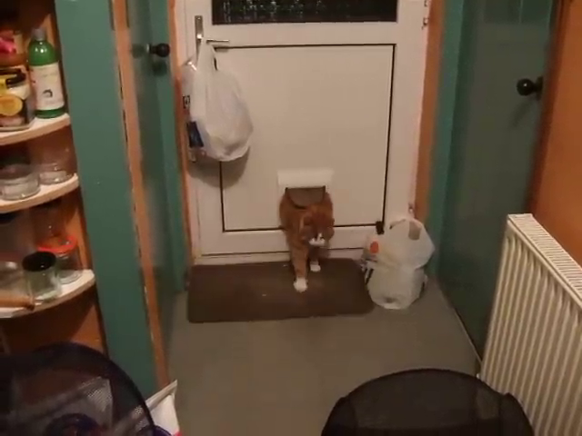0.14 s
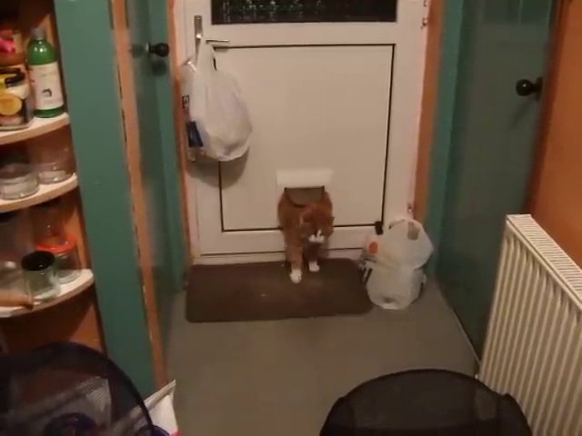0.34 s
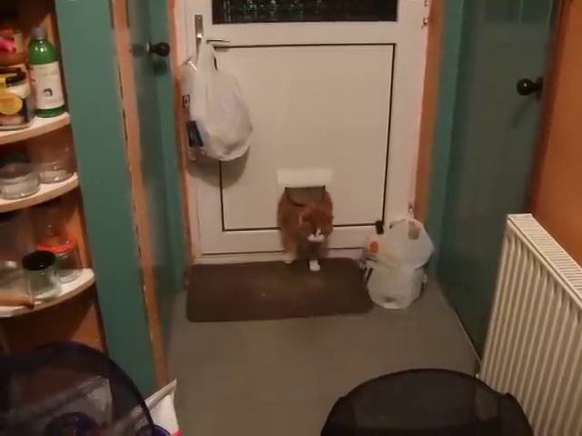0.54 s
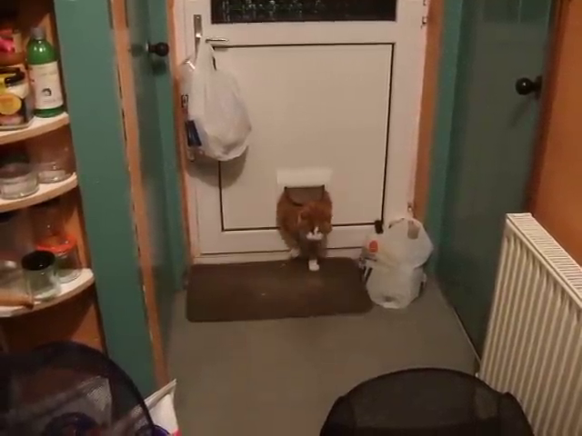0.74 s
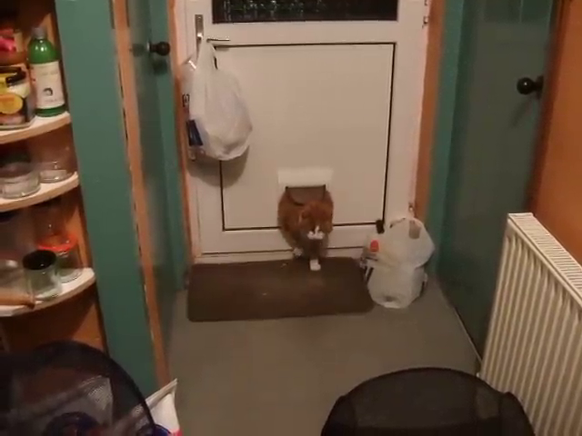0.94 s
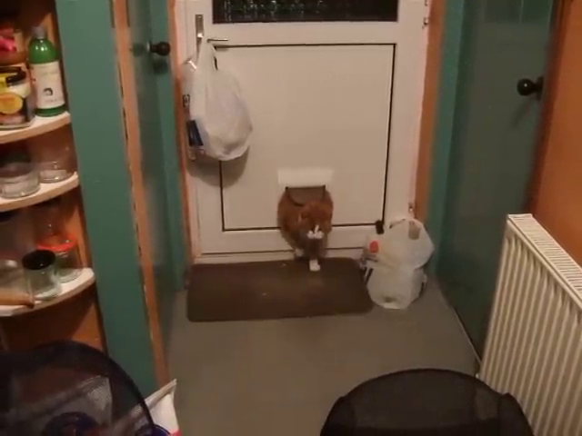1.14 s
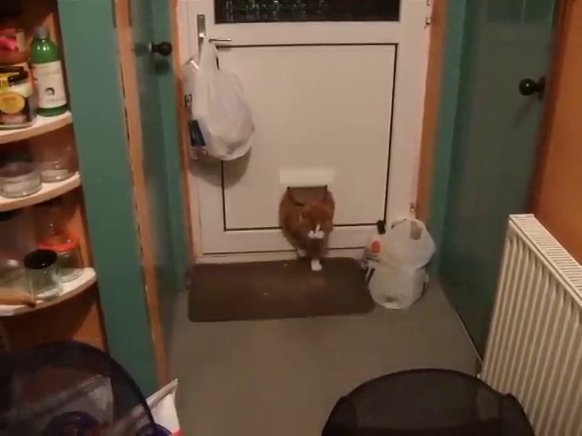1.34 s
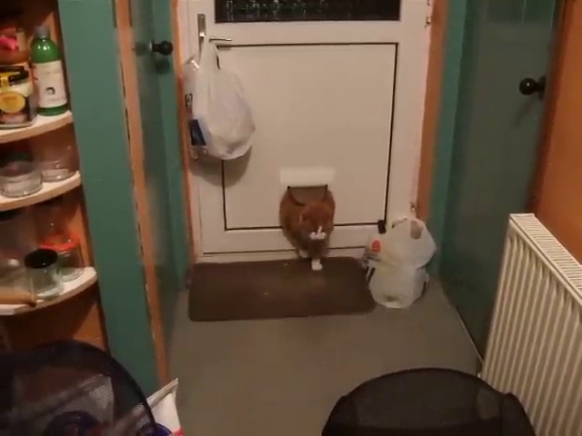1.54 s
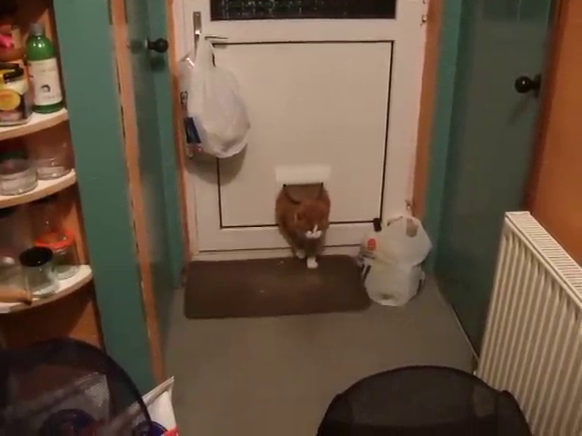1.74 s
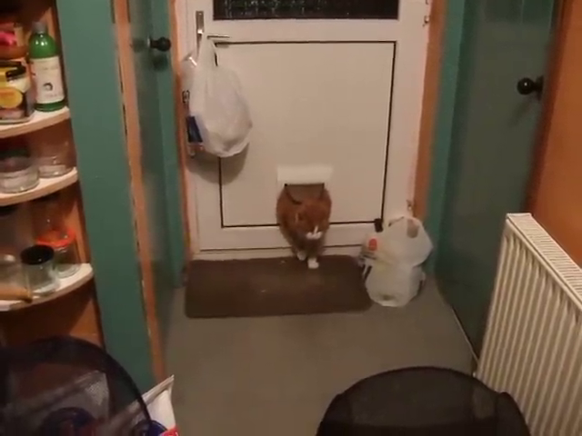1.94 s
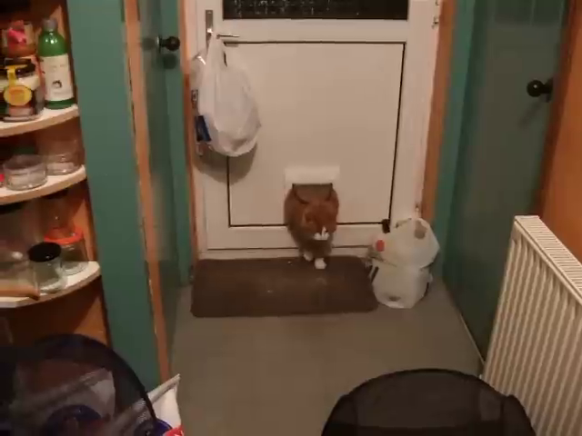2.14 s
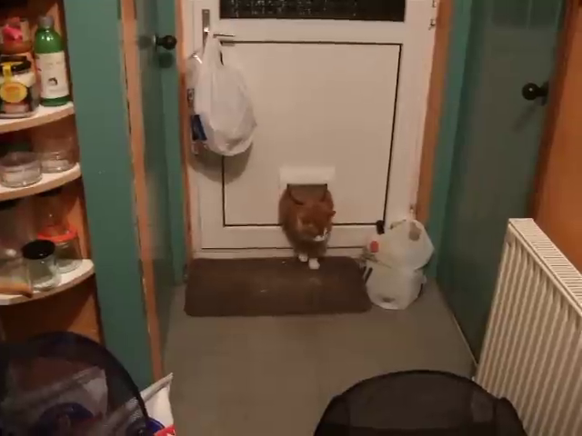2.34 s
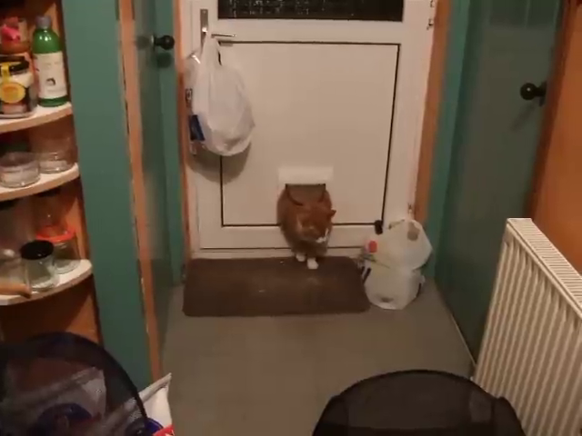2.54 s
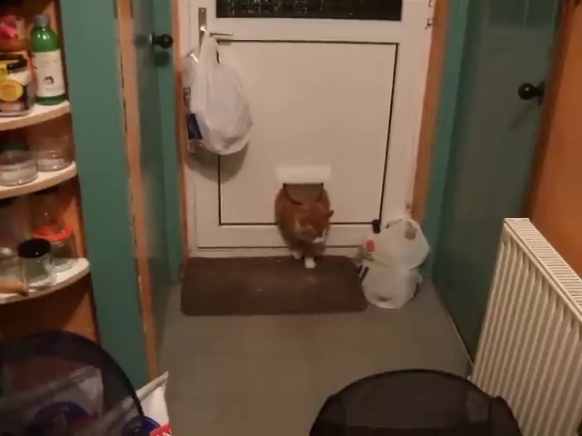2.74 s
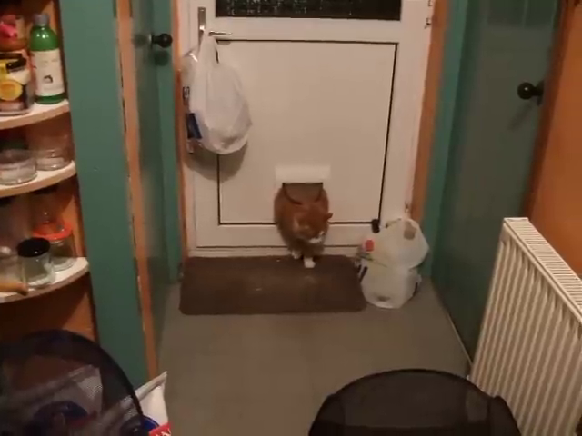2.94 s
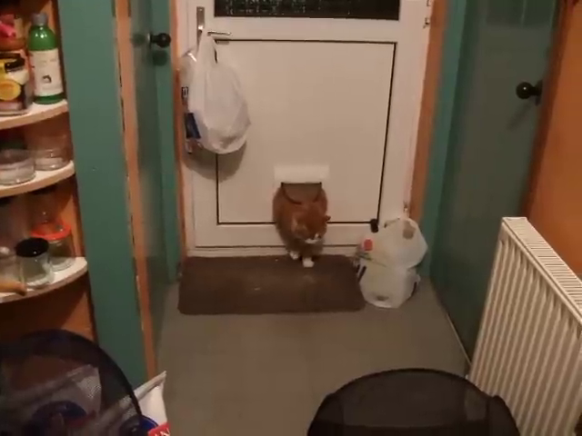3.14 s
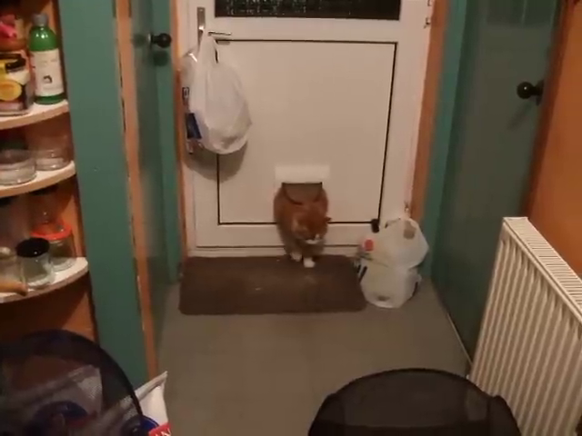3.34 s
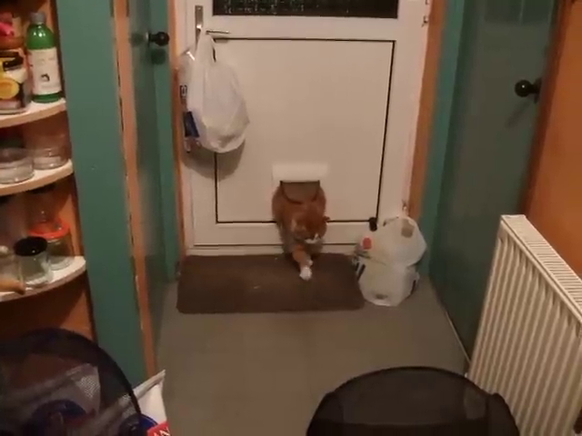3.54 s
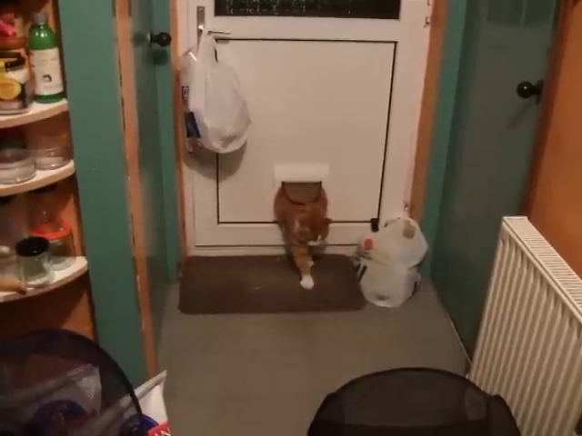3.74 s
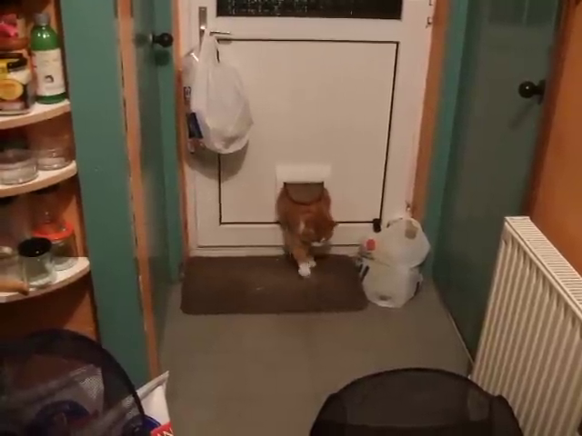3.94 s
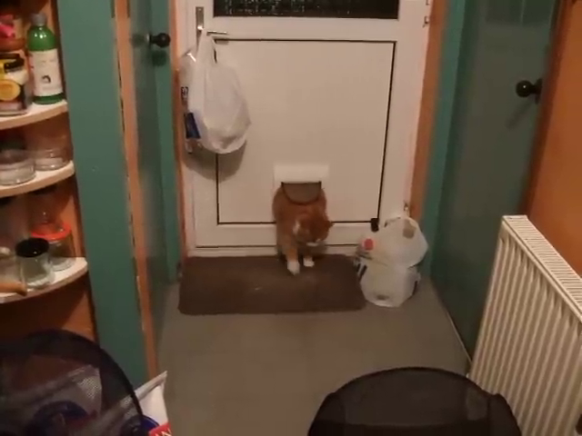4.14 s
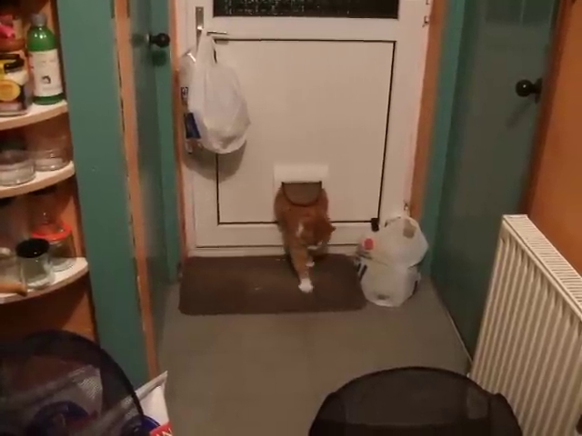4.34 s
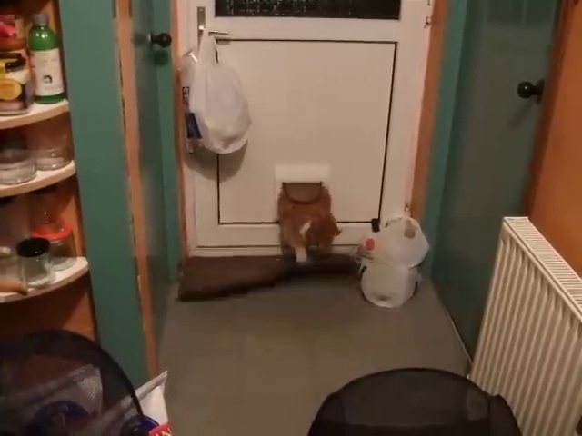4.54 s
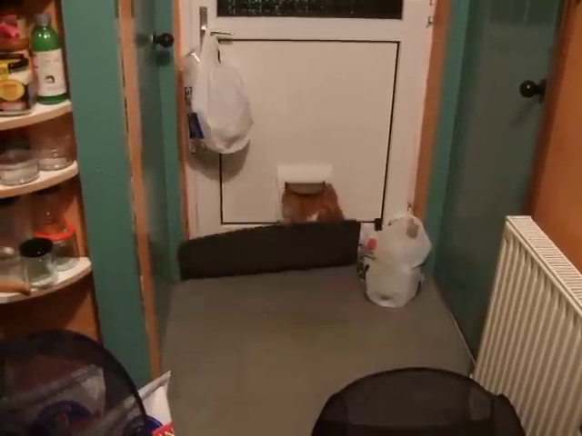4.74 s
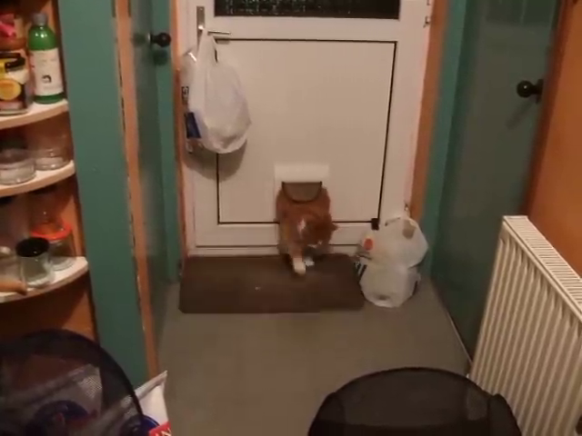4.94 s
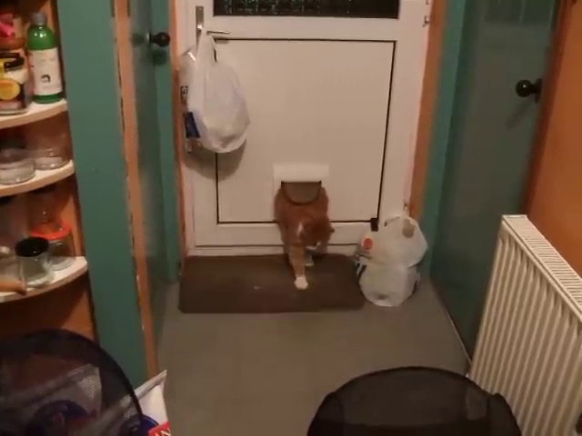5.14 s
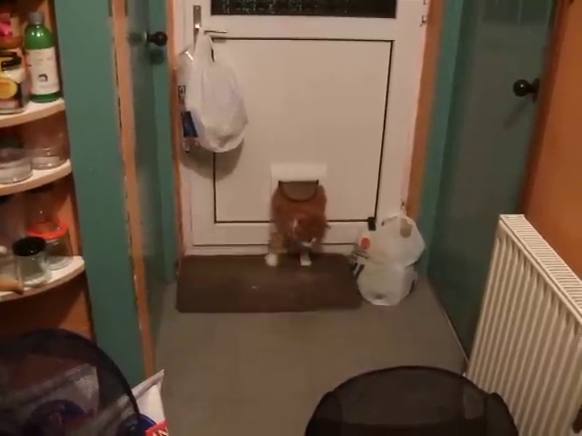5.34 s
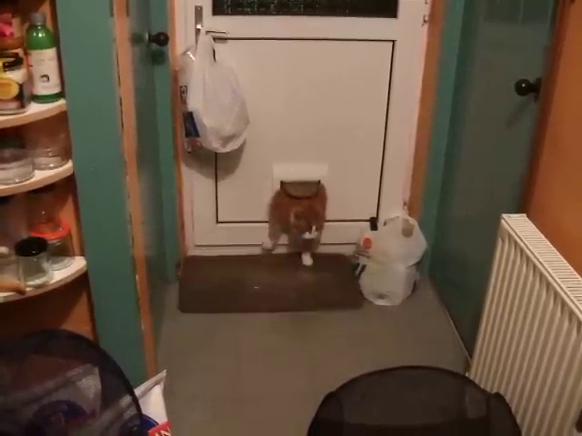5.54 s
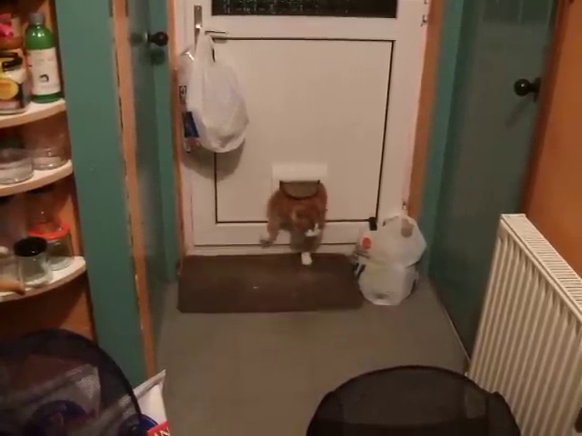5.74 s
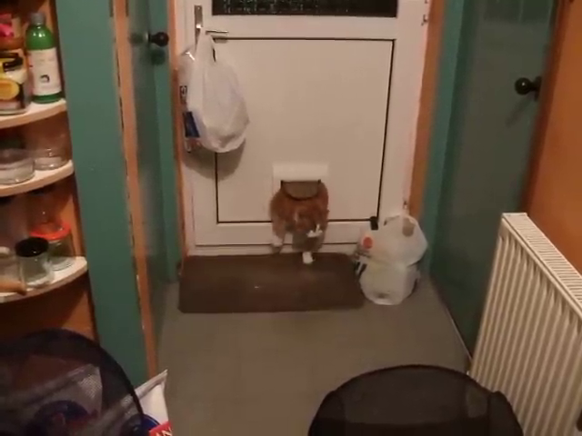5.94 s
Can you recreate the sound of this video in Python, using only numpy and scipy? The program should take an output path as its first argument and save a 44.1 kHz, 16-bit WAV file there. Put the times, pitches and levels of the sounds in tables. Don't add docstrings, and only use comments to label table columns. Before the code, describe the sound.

A cat pushes through a flap in a hollow door. An opening clatter fades into a long, grainy lull of fridge hum, broken by a tiny high meow that cracks at the end. Then come light plastic taps, dull thumps, a quickening rattle of mat and carrier bags, and one hard slap with bottles ringing. Soft rubbing and taps follow. Short indoor echo, gritty low-resolution camera sound.

```python
import sys
import numpy as np
from scipy import signal
from scipy.fft import rfft, irfft, next_fast_len
from scipy.io import wavfile
from scipy.ndimage import map_coordinates

SR = 44100
rng = np.random.default_rng(int(sys.argv[2]) if len(sys.argv) > 2 else 0)


def to_wav(sig):
    pcm = np.clip(np.atleast_2d(sig), -1, 1) * 32767
    pcm = np.round(pcm).astype(np.int16)
    wavfile.write(sys.argv[1], SR, pcm.T)


def ratio(d):
    e = np.asarray(d, float) / 20
    return 10 ** e


N = 264159

# centre f/Hz, width/Hz, level/dB
DOOR_MODES = [(297, 15, -1.5), (331.6, 20, -1), (354, 28, -3.5), (408.4, 30, -1.5)]
# centre f/Hz, width/Hz, level/dB
FLAP_MODES = [(525, 80, 3.5), (686, 100, -0.5), (802, 87, 3.5), (919.5, 90, 1), (1068, 100, -2.5),
              (1358, 180, -8)]
# centre f/Hz, width/Hz, level/dB
FLOOR_MODES = [(64, 81, -15.5), (89.8, 22, 0.5), (167, 30, 0), (228.6, 40, -5)]


def unit(x):
    return x / np.sqrt(np.mean(x ** 2) + 1e-20)


def along(points, hz):
    f, value = np.transpose(points)
    return np.interp(np.log(hz + 1), np.log(f + 1), value)


def curves(rows):
    s, *columns = np.transpose(rows)
    return [np.interp(np.arange(N) / SR, s, column) for column in columns]


def wobble(rate):
    knots = rng.standard_normal(int(N * rate / SR) + 4)
    return map_coordinates(knots, [np.arange(N) * rate / SR])


def filtered(x, response):
    m = next_fast_len(x.shape[-1] + 8192)
    spectrum = rfft(x, m) * response(np.fft.rfftfreq(m, 1 / SR))
    return irfft(spectrum, m)[..., :x.shape[-1]]


def modes(table):
    def response(f):
        total = 0
        for k, (centre, width, db) in enumerate(table):
            damping = 1j * f * width
            total = total + (-1) ** k * ratio(db) * damping / (centre * centre - f * f + damping)
        return total
    return response


def add(track, s, sound):
    i = round(s * SR)
    part = track[max(i, 0):][:len(sound) + min(i, 0)]
    part += sound[max(-i, 0):][:len(part)]


def bursts(rows):
    t = np.arange(N) / SR
    power = 0
    for s, db, swell, hold, fading in rows:
        before = (s - t) / max(swell, 1e-3)
        after = (t - s - abs(hold)) / max(fading, 1e-3)
        distance = np.maximum(before, after).clip(0)
        power = power + ratio(db - 30 * distance) ** 2
    return np.sqrt(power)


def knocks():
    # t/s, flap level/dB, crack level/dB re flap
    tap_events = [(.324, -35.5, 0.5), (.345, -39.5, -16), (3.945, -21, -3.5), (3.971, -18.5, -3),
                  (3.988, -27, -27), (5.248, -25, -6), (5.274, -31.5, -7.5), (5.297, -32, 0.5),
                  (5.631, -36, 3.5)]
    # t/s, flap level/dB, then floor boom, door thump and crack level/dB re flap
    thud_events = [(.252, -41.5, -13.5, -12, -4.5), (1.563, -43, 0, 2.5, -7),
                   (3.822, -44.5, -6.5, -3.5, -4.5), (4.208, -26, -14.5, -3, -8),
                   (4.284, -29, 1.5, -5, -2.5), (4.454, -36.5, -21, -13.5, -7), (4.788, -15.5, -14, 3, 0),
                   (4.812, -21.5, -9, 4.5, -8), (5.011, -18.5, -5.5, -3, -22.5), (5.402, -42, -3, 2, -11),
                   (5.42, -41.5, -8.5, 3.5, -13.5), (5.844, -30.5, -3, -14.5, -7)]
    scrape_events = [(4.531, -33, -33, -9.5, 1.5), (4.584, -21.5, -19.5, -7, -4.5),
                     (4.609, -22.5, -3.5, 2, -1.5), (4.635, -29.5, 8, 12.5, -0.5), (4.7, -30, -14, 5.5, 0),
                     (4.886, -20, -3.5, -4.5, -10)]
    slam_events = [
        (-.004, -10.5, -12.5, -7.5, -1),
        (4.984, -11.5, -15.5, -9.5, -1.5),
    ]
    # f/Hz, level/dB per Hz
    crack_colour = [(800, -22), (1300, -2.5), (1900, -1), (2700, 0), (3300, -2), (4300, -1), (5500, -18.5),
                    (8000, -27), (10000, -50)]

    # centre f/Hz, width/Hz, level/dB
    tap_focus, heavy_focus, slam_focus = (680, 500, 0), (850, 2000, 0), (1500, 1300, 0)
    blows = [(s, db, -32, -26, crack_db, 0.17, tap_focus) for s, db, crack_db in tap_events]
    blows += [(*row, 0.22, heavy_focus) for row in thud_events]
    blows += [(*row, 0.32, heavy_focus) for row in scrape_events]
    blows += [(*row, 0.27, slam_focus) for row in slam_events]

    def level_head(v):
        return v / np.sqrt(np.mean(v[:SR // 50] ** 2))

    out, t = np.zeros(N), np.arange(SR // 2) / SR
    slowness = np.array([[1.1], [.8], [.9], [1.15]])
    first_hit = np.array([[5], [7], [1.8], [.4]])
    for s, db, boom_db, door_db, crack_db, t60, focus in blows:
        fall = ratio(-60 * t / np.clip(t60 * slowness, .02, 1))
        contact = 1 + first_hit * ratio(-60 * t / 0.022)
        contact *= 1 - np.exp(-t / .0015)
        lumps = ratio(3 * rng.standard_normal((4, len(t))))
        rattle = rng.standard_normal((4, len(t))) * lumps * fall * contact

        struck = np.array(FLAP_MODES) + [0, 0, 2.5] * rng.standard_normal((len(FLAP_MODES), 3))
        soft_hz = 3000 * ratio(0.32 * (db + 26.5))

        def flap_response(hz):
            return modes(struck)(hz) * modes([focus])(hz)

        def crack_response(hz):
            return ratio(along(crack_colour, hz)) / (1 + (hz / soft_hz) ** 4)

        boom = ratio(boom_db + 2.5) * level_head(filtered(rattle[0], modes(FLOOR_MODES)))
        door = ratio(door_db + 0.93) * level_head(filtered(rattle[1], modes(DOOR_MODES)))
        flap = level_head(filtered(rattle[2], flap_response))
        crack = ratio(crack_db - 3.5) * level_head(filtered(rattle[3], crack_response))
        add(out, s, ratio(db - 10) * (boom + door + flap + crack))
    return out


def slaps():
    # t/s, peak level/dB, pulse width/s
    landings = [(0, -30, 0.0044), (4.2089, -21.5, 0.00082), (4.637, -18.5, 0.00054), (4.778, -29, 0.00036),
                (4.7895, -16, 0.00044), (4.7963, -16.5, 0.00045), (4.89, -15, 0.00046),
                (4.898, -18.5, 0.00064), (4.985, -4.5, 0.00042), (4.9876, -6, 0.00023)]
    out, t = np.zeros(N), np.arange(SR // 10) / SR
    for s, db, width in landings:
        u = t / width
        add(out, s, -ratio(db + 5) * u * (2 - u) * np.exp(-u))
    return out


def bags():
    # t/s of full level, crackle level/dB, swell/s, hold/s, fading/s (30 dB each way)
    rustles = [(0, -20.5, .001, 0.002, 0.13), (.2, -50, 0.49, .13, 0.17), (1.47, -53, .055, 0, .09),
               (3.955, -38, .012, 0, 0.053), (3.973, -34, 0.035, 0, .085), (4.588, -22.5, 0.094, 0, 0.32),
               (4.706, -27, 0.076, 0, .13), (4.79, -31.5, .004, 0, .6), (4.894, -35, 0.18, 0, .4),
               (4.976, -28.5, 0.072, 0.044, 0.14), (4.988, -17.5, 0.011, 0, 0.044),
               (5.004, -32, .03, 0, .23), (5.14, -56.5, 0.17, 0.013, 0.44),
               (5.25, -42.5, 0.011, 0.058, .065)]
    # f/Hz, level/dB per Hz
    film_colour = [(710, -34), (1200, -14.5), (1870, -9), (2830, -4), (3060, -6), (7050, -4), (7270, 0),
                   (8000, 2.5), (10400, -48), (17600, -120)]
    snaps = rng.standard_normal(N) * ratio(5 * rng.standard_normal(N) + 1.8 * wobble(120))
    film = unit(filtered(snaps, lambda hz: ratio(along(film_colour, hz))))
    bumping = rng.standard_normal(N) * ratio(3 * wobble(60))
    body = unit(filtered(bumping, modes(FLAP_MODES)))
    return bursts(rustles) * (film + ratio(-6.5) * body)


def bottles():
    # t/s, level/dB
    clinks = [
        (-.004, -30.5),
        (4.587, -25.5),
        (4.989, -19),
        (5.011, -29.5),
    ]
    # f/Hz, level/dB, 60 dB fall time/s
    glass = [(2713, -17, .2), (4226, -16, .25), (4414, -10, .14), (6395, -10, .12), (6492, -10, .14),
             (7330, -8, .15), (7407, 0, .22), (7854, -18, .2)]
    out, t = np.zeros(N), np.arange(SR // 2) / SR
    for s, db in clinks:
        ring = 0
        for hz, level, t60 in glass:
            strength_db = level + rng.normal(0, 1.3)
            ring = ring + ratio(strength_db - 60 * t / t60) * np.sin(2 * np.pi * hz * t)
        add(out, s, ratio(db) * ring * (1 - np.exp(-t / 0.00048)))
    return out


def meow():
    # t/s, f/Hz
    pitch = [(1.61, 774), (1.66, 736.4), (1.726, 696), (1.78, 669.4), (1.835, 655.4), (2.055, 643.5),
             (2.11, 614), (2.132, 563), (2.15, 548)]
    # t/s, effort level/dB, mouth resonance f/Hz, opening 0-1
    mouth = [(1.625, -58.5, 915, 0.2), (1.682, -52.5, 1590, 0.5), (1.715, -53.5, 2190, 1),
             (1.775, -57, 2250, 1), (1.86, -51.5, 2610, 0.88), (1.95, -53, 2950, .75),
             (2.04, -54, 1816, 0.1), (2.066, -52.5, 1320, 0.13), (2.105, -50.5, 1220, 0.07)]
    partials_db = [-1, -1, -4, -8, -23.5, -7]
    shut_lips_db = [-0.5, -1.5, -5.5, -10, -13, -25]
    # t/s, level/dB re effort
    creaks = [(2.135, -1), (2.144, -3.5), (2.155, -10.5), (2.173, -9), (2.186, -12), (2.203, -25.5)]
    trills_db = [6, .8, 1, 2, 2, 2]

    (hz,), (effort_db, mouth_hz, opening) = curves(pitch), curves(mouth)
    t = np.arange(N) / SR
    gate = np.clip(np.minimum((t - 1.605) / .025, (2.118 - t) / .011), 0, 1)
    for s, db in creaks:
        gate = gate + ratio(db) * np.exp(-((t - s) / .0035) ** 2)

    trill = np.clip((1.8 - t) / 0.08, 0, 1) * np.sin(2 * np.pi * 29 * (t - 1.615))
    roughness_db = 1.2 * wobble(130)
    phase = 2 * np.pi * np.cumsum(hz * (1 + .003 * wobble(45))) / SR
    mouth_db = 11 + 5 * (1 - opening)
    voice = 0
    for k, (db, shut_db, trill_db) in enumerate(zip(partials_db, shut_lips_db, trills_db)):
        off_mouth = ((k + 1) * hz - mouth_hz) / 220
        level_db = effort_db + db + mouth_db / (1 + off_mouth ** 2)
        level_db = level_db + shut_db * (1 - opening) + roughness_db
        level_db = level_db + trill_db * trill + 1.4 * wobble(60)
        voice = voice + ratio(level_db) * np.sin((k + 1) * phase)
    return np.sqrt(2) * gate * voice


def mat():
    # t/s of full level, level/dB, swell/s, hold/s, fading/s (30 dB each way)
    drags = [(.09, -41.5, 0.038, 0.013, 0.18), (.2, -55.5, 0.083, .02, 0.12),
             (3.995, -46, 0.034, 0.0057, .1), (4.03, -52.5, 0.082, 0.0049, 0.67),
             (4.345, -44.5, .03, 0.0058, 0.13), (4.52, -53, 0.08, 0, .03),
             (5.075, -34.5, .03, 0.0031, 0.18), (5.38, -42, .15, .04, .06),
             (5.71, -47.5, 0.04, 0.011, 0.12), (5.875, -46, 0.042, 0, 0.26)]
    rub = rng.standard_normal(N) * ratio(4 * wobble(50))
    boards = unit(filtered(rub, modes(FLOOR_MODES)))
    door_foot = unit(filtered(rub, modes(DOOR_MODES)))
    return bursts(drags) * unit(boards + .9 * door_foot)


def hall(x):
    # f/Hz, 60 dB fall time/s
    echo_t60 = [(100, 0.48), (500, 0.45), (2000, .35), (8000, .28)]
    hz, t, z = signal.stft(rng.standard_normal(SR // 2), SR, nperseg=256)
    fall = ratio(-60 * t / along(echo_t60, hz)[:, None])
    tail = signal.istft(z * fall, SR, nperseg=256)[1]
    late = np.pad(x, (200, 0))
    return signal.fftconvolve(late, tail / np.linalg.norm(tail))[:N]


def hall_air():
    # f/Hz, level/dB per Hz
    air_colour = [(10, 2), (30, 0), (60, -8.5), (120, -4.5), (220, -11), (330, -4.5), (500, -12.5),
                  (900, -12), (1500, -19), (4000, -24.5), (8500, -22)]
    # f/Hz, rms level/dB, wander/Hz
    hum_tones = [(113.1, -68, 6), (311.4, -71, 8), (423.5, -61.5, 2), (7860, -63.5, 8)]
    air = unit(filtered(rng.standard_normal(N), lambda hz: ratio(along(air_colour, hz))))
    hum = 0
    for hz, db, wander in hum_tones:
        phase = 2 * np.pi * np.cumsum(hz + wander * wobble(25)) / SR
        hum = hum + ratio(db + 4 + 1.5 * wobble(6)) * np.sin(phase)
    return ratio(-51.5 + 0.9 * wobble(3)) * air + hum


def scene():
    near = knocks() + slaps() + bags() + bottles() + mat()
    cat = meow()
    echo = hall(ratio(-14) * near + ratio(-13) * cat)
    return (near + cat + echo + hall_air())[None]


def band_limit(x):
    return signal.sosfilt(signal.butter(12, 8970, fs=SR, output="sos"), x)


def record(dry):
    camera_rate, up, down = 16000, 441, 160
    step = 1 / 128 / np.sqrt(2)
    slow = signal.resample_poly(dry, down, up, axis=1)
    coarse = step * np.floor(slow / step + .07)
    smoother = signal.firwin(32 * up + 1, 7950, window=("kaiser", 9), fs=camera_rate * up)
    fast = signal.resample_poly(coarse, up, down, axis=1, window=smoother)
    mix = np.pad(fast, ((0, 0), (0, 8)))[:, :N]
    return band_limit(mix)


dry = scene()
out = record(dry)
to_wav(out)
```